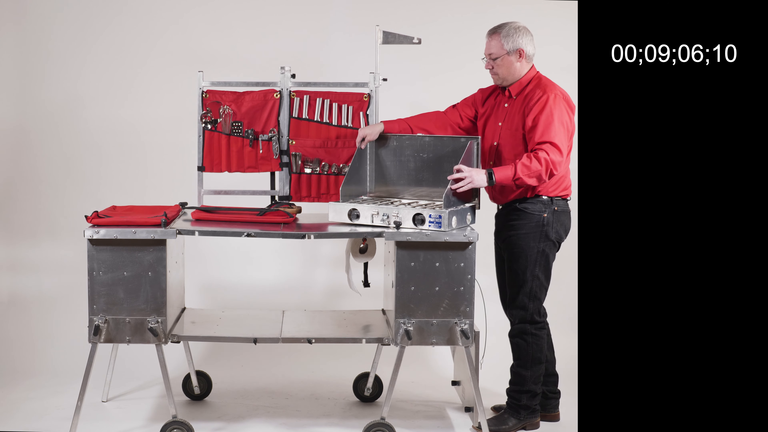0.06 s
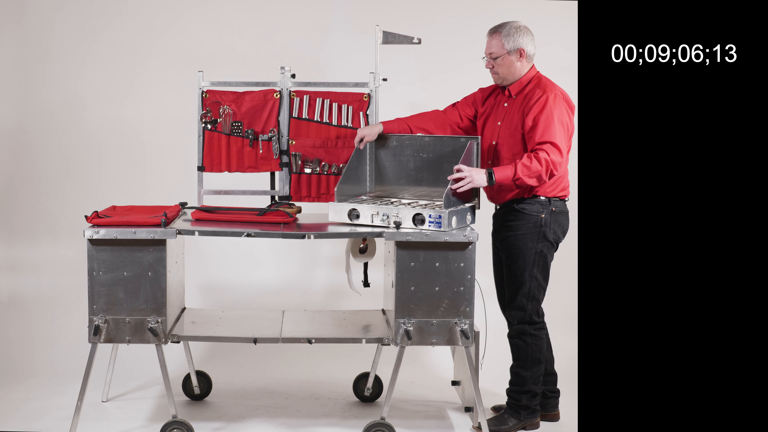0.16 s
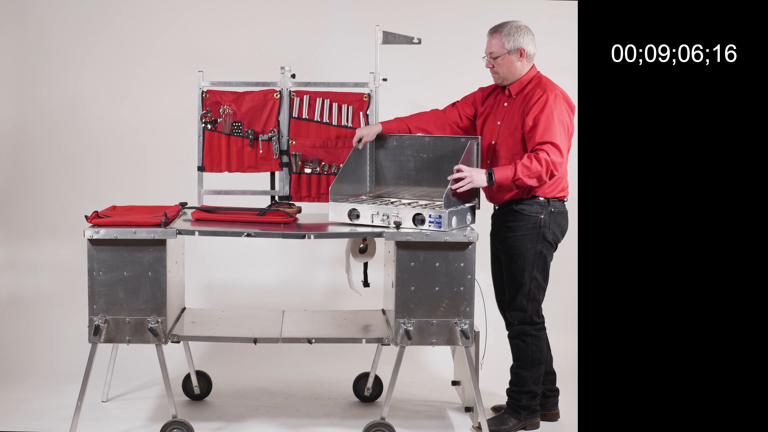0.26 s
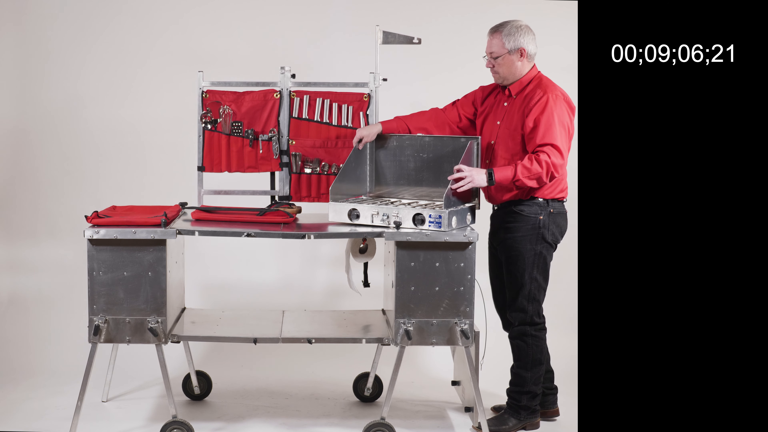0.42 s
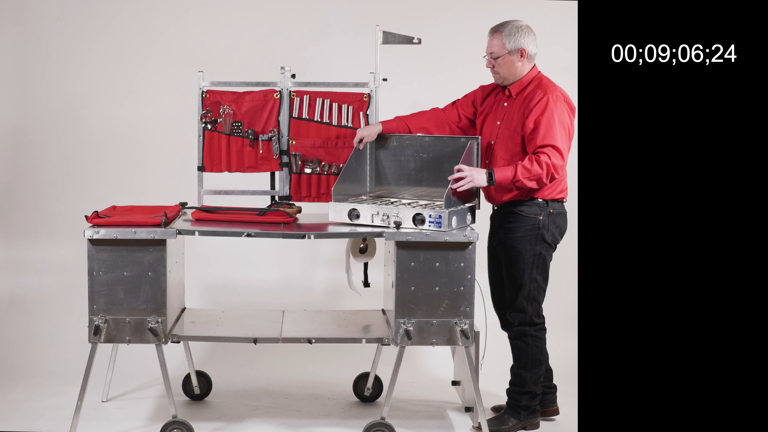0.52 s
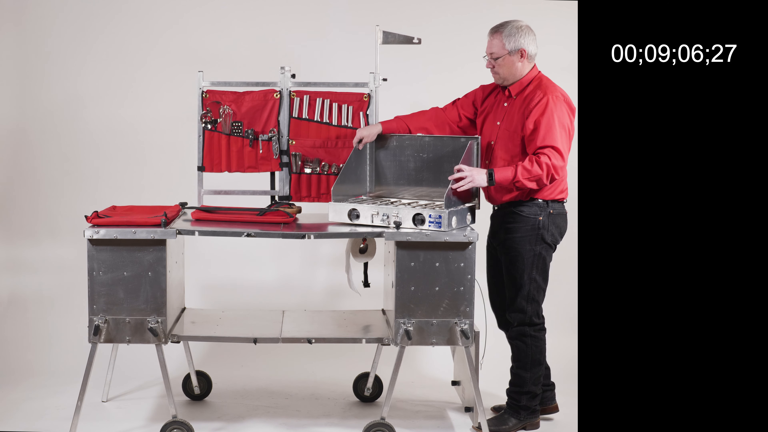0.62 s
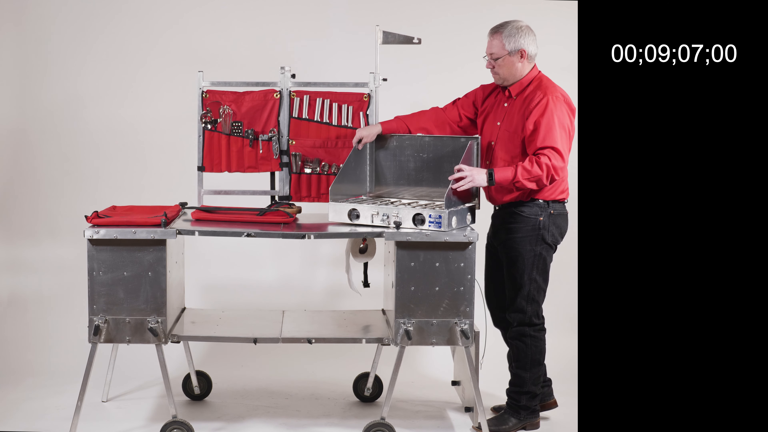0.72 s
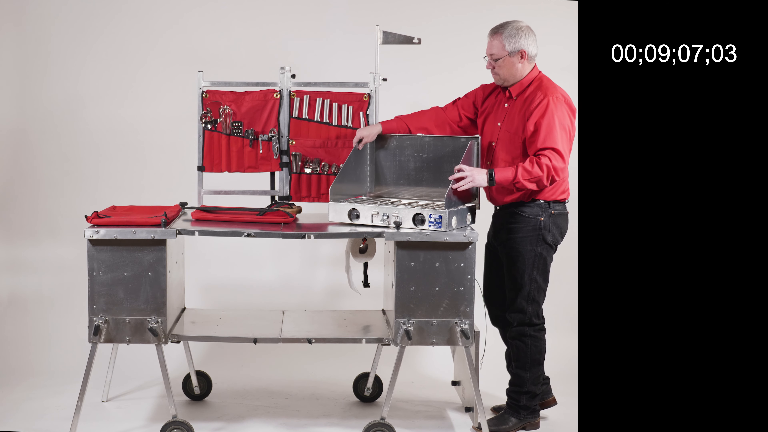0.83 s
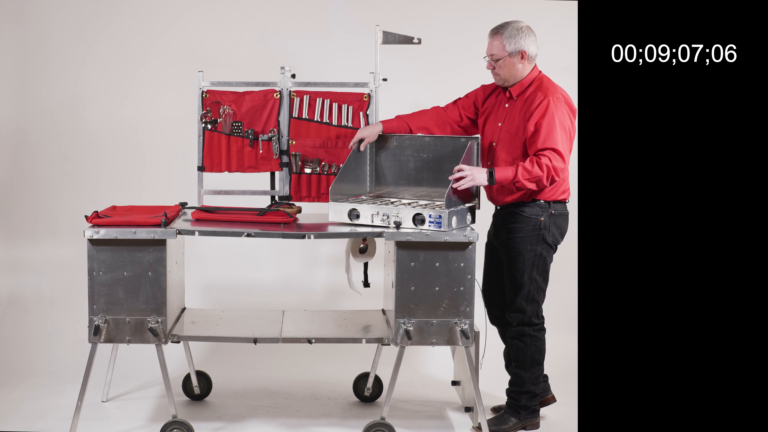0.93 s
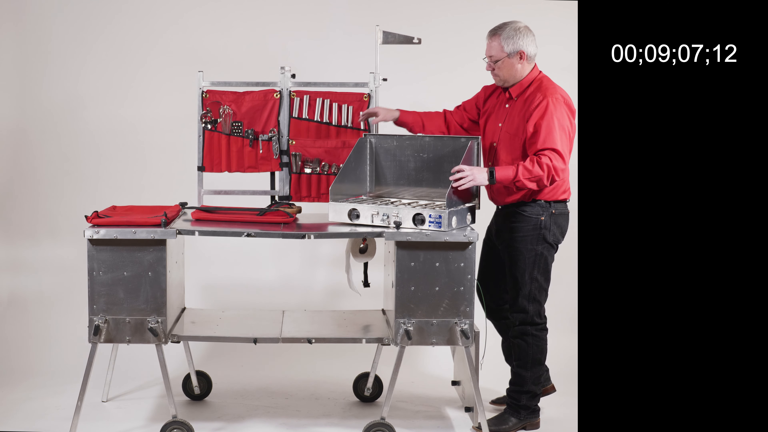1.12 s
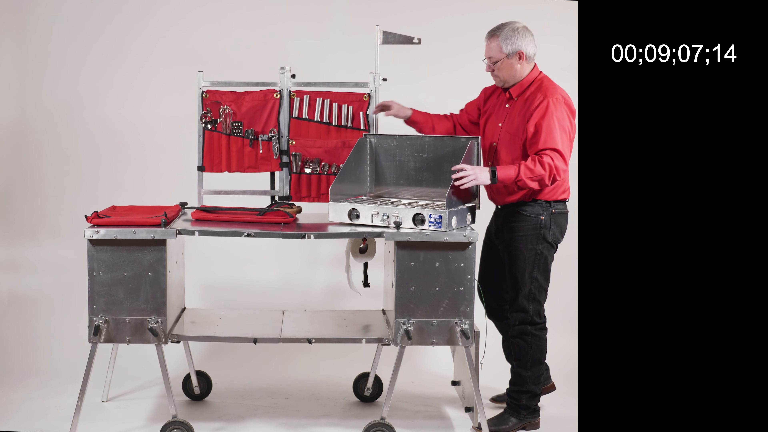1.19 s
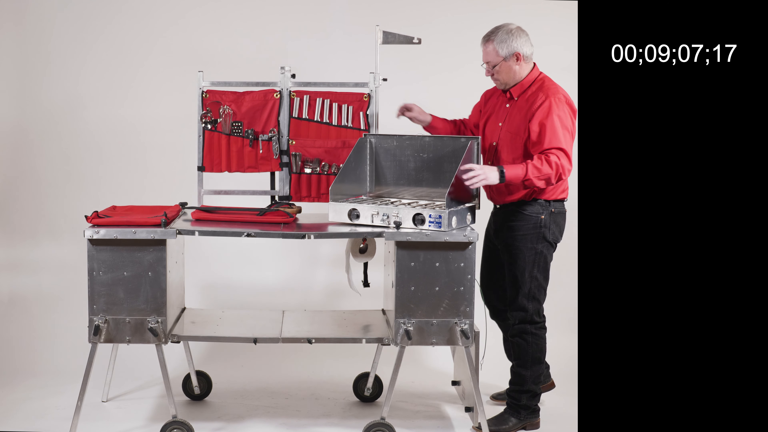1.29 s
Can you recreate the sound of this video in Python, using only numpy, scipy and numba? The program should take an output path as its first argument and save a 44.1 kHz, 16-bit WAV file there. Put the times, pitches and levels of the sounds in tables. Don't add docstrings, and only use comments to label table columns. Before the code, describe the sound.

Thin aluminium camp stove panels clank in a bare, echoing room. An earlier metallic ring fades at the start, with a faint touch near 0.13 seconds. A rattling burst runs from 0.23 to 0.33, a softer flap clack comes around 0.59, and bright hard clanks seat the panel at 0.74 to 0.77. The ringing decays over faint low room tone. Sound is on the right; the left has only hiss.

```python
import sys
import numpy as np
from scipy import signal
from scipy.fft import rfft, irfft
from scipy.io import wavfile
from numba import njit

SR = 44100
rng = np.random.default_rng(int(sys.argv[2]) if len(sys.argv) > 2 else 0)


def bounce(signal):
    frames = np.transpose(np.atleast_2d(signal))
    limited = np.clip(frames, -1, 1)
    pcm = np.round(limited * 32767).astype(np.int16)
    wavfile.write(sys.argv[1], SR, pcm)


def ratio(d):
    e = np.asarray(d, float) / 20
    return 10 ** e


N = 59535
LEAD = 8192


def along(table, hz):
    points = np.array(table, float)
    return np.interp(np.log(hz), np.log(points[:, 0]), points[:, 1])


def air():
    # f/Hz, level/dB
    air_colour = [(25, -25), (120, 4.5), (500, -5.5), (1500, -25), (4000, -32.5), (9000, -53)]
    hz = np.arange(N // 2 + 1) * SR / N + 1
    noise = irfft(rfft(rng.standard_normal(N)) * ratio(along(air_colour, hz)), N)
    return ratio(-64) * noise / np.std(noise)


@njit
def ring(pole, at, gain, n, feed):
    out = np.zeros(n)
    for m in range(len(pole)):
        z, e = 0j, 0
        for i in range(at[0, m], n):
            z *= pole[m]
            while e < len(at) and at[e, m] <= i:
                if feed:
                    z += abs(gain[e, m]) * np.sign(z.real + 1e-20)
                else:
                    z += gain[e, m]
                e += 1
            out[i] += z.imag
            if e == len(at) and abs(z.real) + abs(z.imag) < 1e-8:
                break
    return out


def strike(times, db, hz, t60, spread_s, scatter_db, feed=False):
    luck = rng.standard_normal((len(times), 3, len(hz)))
    late = spread_s * np.abs(luck[:, 0]) * np.sqrt(1000 / hz)
    at = np.clip(LEAD + (times[:, None] + late) * SR, 0, LEAD + N - 1).astype(np.int64)
    gain = ratio(db + scatter_db * luck[:, 1]) * np.sign(luck[:, 2])
    order = np.argsort(at, axis=0)
    at = np.take_along_axis(at, order, axis=0)
    gain = np.take_along_axis(gain, order, axis=0)
    pole = np.exp((2j * np.pi * hz - np.log(1000) / np.maximum(t60, 1e-3)) / SR)
    return ring(pole, at, gain, LEAD + N, feed)


def tick(times, db, count=70):
    # f/Hz, level/dB
    crack_colour = [(2000, -8.5), (3500, -0.5), (6000, 0.5), (8000, -3), (10000, -10), (15000, -16.5)]
    # f/Hz, level/dB, t60/s
    tab_rings = [(2940, 4.5, 0.018), (4250, -14, 0.014), (5400, -26, 0.0089), (7000, -29, .01),
                 (7640, -23, .016)]

    hz = 2000 + 13000 * (np.arange(count) + rng.random(count)) / count
    crack_db = db[:, None] + along(crack_colour, hz) - 20.5
    crack = strike(times, crack_db, hz, 0.02 * (5000 / hz) ** .5, spread_s=.004, scatter_db=1.77)

    hz, tab_db, t60 = np.array(tab_rings, float).T
    tab = strike(times, db[:, None] + tab_db - 18, hz, t60, spread_s=0.0029, scatter_db=1.5)

    snap_hz, snap_s, snap_lag_s = 7400, .00016, .0013
    t = (np.arange(LEAD + N) - LEAD) / SR - times[:, None] - snap_lag_s
    luck = rng.standard_normal((len(times), 2))
    swell = np.exp(-(t / snap_s) ** 2 / 2)
    pitch = snap_hz * (1 + 0.013 * luck[:, :1])
    snap = swell * np.cos(2 * np.pi * pitch * t + np.pi * luck[:, 1:])
    return crack + tab + ratio(db) @ snap


def panel(contacts, strong, strong_db, haze_db, frame_db, count=300):
    # f/Hz, level/dB
    sheet_colour = [(70, -10), (150, -6.5), (350, -7), (1000, 0), (2500, 0.5), (5000, 4), (9000, 0)]
    # f/Hz, t60/s
    sheet_decay = [(80, 0.25), (400, 0.25), (1500, 0.12), (4000, 0.043), (12000, 0.046)]
    # f/Hz, level/dB, t60/s
    frame_modes = [(167, -17, 1.17), (206, -20, 0.97), (454, -21, 1.5), (471, -27, 1.8), (519, -29.5, 1.5),
                   (524, -23, 2.7), (553, -28, 1.5), (655, -23.5, 0.86), (745, -22, 1.18),
                   (1350, -23, 0.63)]
    times, tick_db, sheet_db, centre_hz = np.array(contacts, float).T
    spread_s = .008

    def blow(hz):
        octaves = np.log2(hz / centre_hz[:, None])
        return sheet_db[:, None] - 1.5 * octaves ** 2

    hz, mode_db = np.array(strong, float).T
    drive_db = (sheet_db[:, None] + blow(hz)) / 2
    drive_db = drive_db + mode_db - mode_db.max() + strong_db
    t60 = .15 * (500 / hz) ** 0.69
    modes = strike(times, drive_db, hz, t60, spread_s / 2, scatter_db=1.9, feed=True)

    hz = 60 + 9000 * ((np.arange(count) + rng.random(count)) / count) ** 2
    drive_db = blow(hz) + along(sheet_colour, hz) - 21.5 + haze_db
    haze = strike(times, drive_db, hz, along(sheet_decay, hz), spread_s, scatter_db=4)

    hz, mode_db, t60 = np.array(frame_modes, float).T
    frame = strike(times, blow(hz) + mode_db + frame_db, hz, t60, spread_s, scatter_db=1.0, feed=True)
    return modes + haze + frame + tick(times, tick_db)


def earlier_contacts():
    # t/s, tick level/dB, sheet level/dB, centre f/Hz
    earlier_hits = [
        (-.13, -20, -36.5, 986),
        (-.06, -25.5, -35, 1050),
    ]
    # f/Hz, level/dB
    earlier_modes = [(328.4, -63), (656.8, -98), (845.2, -94), (1130, -65.5), (1281, -74), (1529, -62.5),
                     (1960, -91)]
    return panel(earlier_hits, earlier_modes, strong_db=-5, haze_db=-1, frame_db=-18)


def nudge():
    # t/s, tick level/dB, sheet level/dB, centre f/Hz
    nudge_hits = [
        (0.1341, -43, -40, 1580),
        (0.1414, -45, -44.5, 1700),
        (.216, -47, -39.5, 400),
    ]
    # f/Hz, level/dB
    nudge_modes = [(220.7, -65), (710.6, -79), (1642, -53), (2056, -58.5), (2627, -58), (3025, -63),
                   (3957, -79)]
    return panel(nudge_hits, nudge_modes, strong_db=-7, haze_db=0.5, frame_db=-29)


def unfold():
    # t/s, tick level/dB, sheet level/dB, centre f/Hz
    unfold_hits = [(.2322, -33, -26, 500), (.2424, -50, -35.5, 700), (.2567, -30, -40, 700),
                   (.2671, -27, -30, 755), (.2733, -18.5, -26, 810), (.2883, -28.5, -37, 750),
                   (.295, -28, -28.5, 760), (.3010, -29, -31, 745), (.3156, -25, -29.5, 790),
                   (.3226, -31.5, -33, 750), (.3283, -35, -36, 700)]
    # f/Hz, level/dB
    unfold_modes = [(183.0, -52.5), (333.8, -47.5), (430.7, -44), (522.2, -42.5), (640.6, -59.5),
                    (732.1, -80), (786.0, -55), (931.3, -45), (974.4, -86), (1077, -50), (1367, -44),
                    (1405, -49), (1572, -65)]
    return panel(unfold_hits, unfold_modes, strong_db=-14.5, haze_db=-0.5, frame_db=-20.5)


def side_flap():
    # t/s, tick level/dB, sheet level/dB, centre f/Hz
    flap_hits = [
        (.5237, -37.5, -41, 704),
        (.568, -64, -38.5, 476),
        (.574, -52, -44, 470),
        (.580, -54, -38.5, 527),
        (.5871, -32, -29, 650),
        (.5962, -39.5, -31, 630),
        (.6054, -45, -35.5, 616),
        (.6134, -62, -37, 600),
    ]
    # f/Hz, level/dB
    flap_modes = [(226.1, -59.5), (333.8, -52), (463.0, -47.5), (683.7, -54), (931.3, -48.5), (1061, -60),
                  (1217, -46), (1367, -48.5), (1599, -66), (1707, -60), (2164, -75), (2363, -75)]
    return panel(flap_hits, flap_modes, strong_db=-12.5, haze_db=-3.5, frame_db=-25)


def seat():
    # t/s, tick level/dB, sheet level/dB, centre f/Hz
    seat_hits = [
        (0.7093, -50, -43, 672),
        (0.7324, -44, -41, 650),
        (0.7364, -29.5, -36.5, 700),
        (0.7442, -22.5, -26.5, 700),
        (0.7627, -19, -34.5, 690),
        (0.7684, -30, -35.5, 670),
        (0.7824, -60, -33.5, 690),
    ]
    # f/Hz, level/dB
    seat_modes = [(199.2, -59.5), (333.8, -56), (425.3, -59), (452.2, -64), (516.8, -49), (780.6, -57.5),
                  (1028, -57.5), (1211, -60), (1270, -66), (1384, -51), (1491, -74), (2024, -53.5),
                  (2363, -61)]
    return panel(seat_hits, seat_modes, strong_db=-14.5, haze_db=0, frame_db=-16)


def room(count=30000):
    # f/Hz, level/dB
    room_colour = [(100, 1.5), (500, 1.5), (2000, 0), (5000, -8), (7500, -7.5), (11000, -3)]
    # f/Hz, t60/s
    room_decay = [(80, 0.74), (400, 0.67), (2000, 0.83), (5000, 0.78), (9000, 0.33), (15000, 0.39)]
    t = np.arange(count) / SR
    f = np.arange(count // 2 + 1) * SR / count + 1
    spectrum = rfft(rng.standard_normal(count))
    echoes = np.zeros(count)
    for k in range(17):
        hz = 60 * 2 ** (k / 2)
        share = np.cos(np.clip(np.log2(f / hz), -.5, .5) * np.pi) ** 2
        fade_db = along(room_colour, hz) - 60 * t / along(room_decay, hz)
        echoes += irfft(spectrum * share, count) * ratio(fade_db)
    onset_s = 0.0041
    echoes *= 1 - np.exp(-(t / onset_s) ** 2)
    return echoes / np.sqrt(np.sum(echoes ** 2))


def scene():
    dry = 2 * (earlier_contacts() + nudge() + unfold() + side_flap() + seat())
    heard = dry + ratio(-8.5) * signal.fftconvolve(dry, room())[:LEAD + N]
    heard = signal.sosfilt(signal.butter(3, 108, "high", fs=SR, output="sos"), heard)
    heard = signal.sosfilt(signal.butter(2, 9800, fs=SR, output="sos"), heard)
    return np.array([np.zeros(N), heard[LEAD:] + air()])


def top_cut(x):
    return signal.sosfilt(signal.butter(12, 15840, fs=SR, output="sos"), x)


def record(dry):
    hiss_db = np.array([[-73], [-72]])
    hiss = rng.standard_normal((2, N)) * ratio(hiss_db)
    return top_cut(dry + hiss)


dry = scene()
out = record(dry)
bounce(out)
```